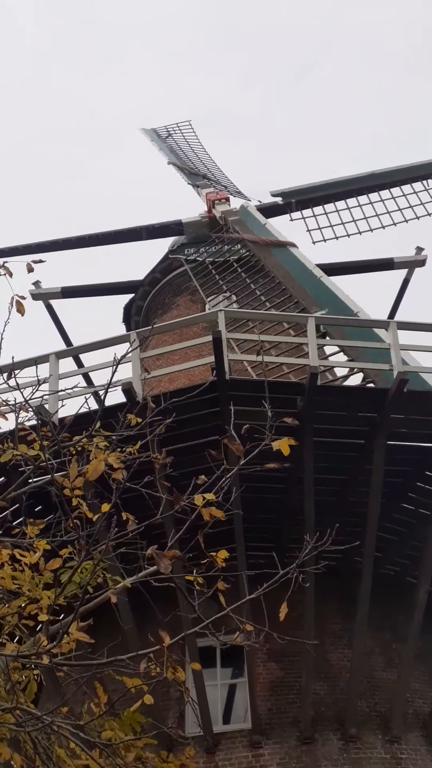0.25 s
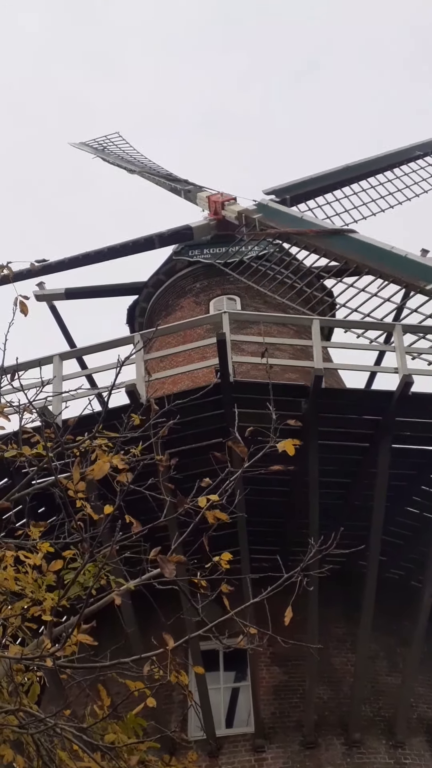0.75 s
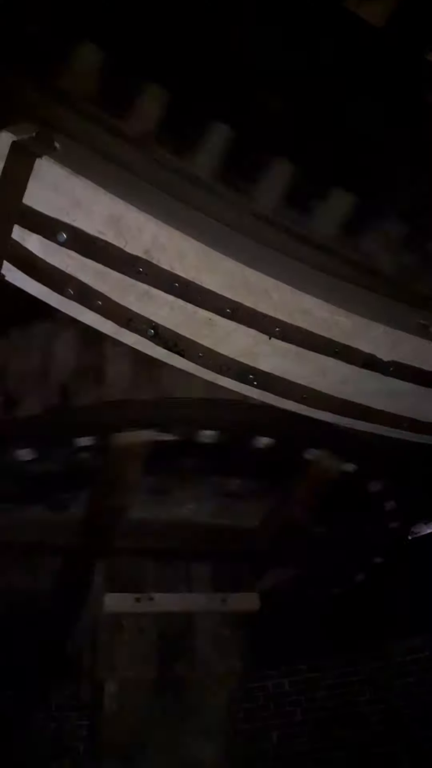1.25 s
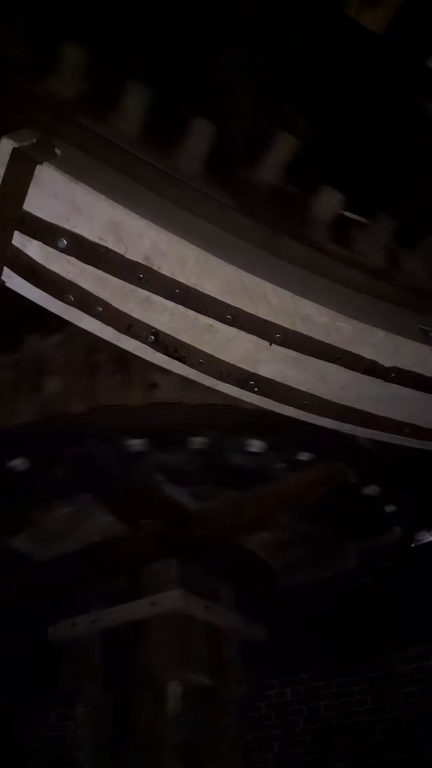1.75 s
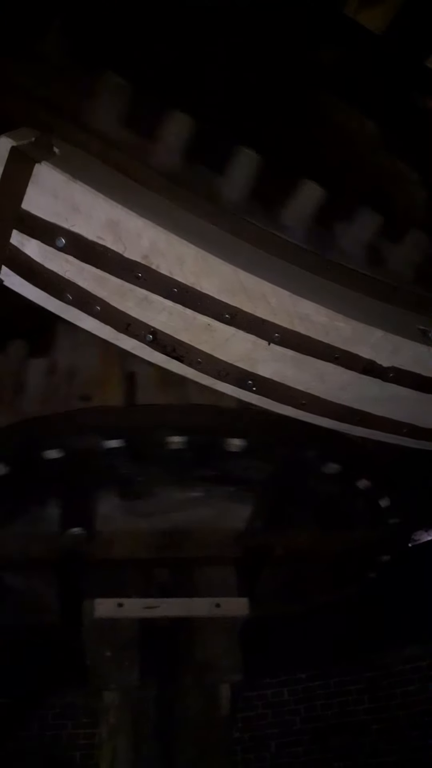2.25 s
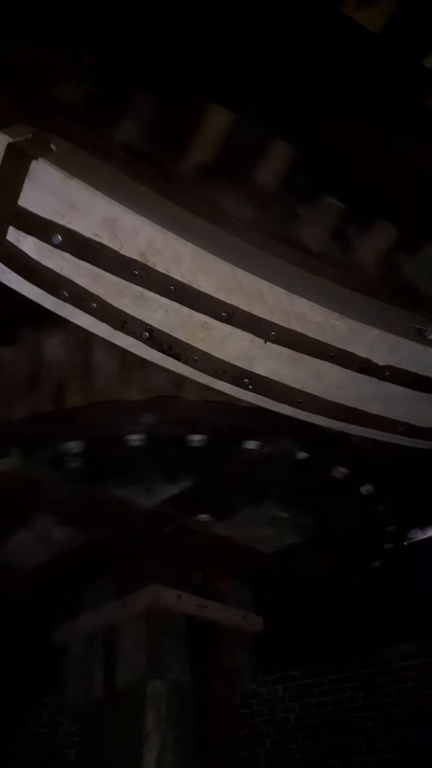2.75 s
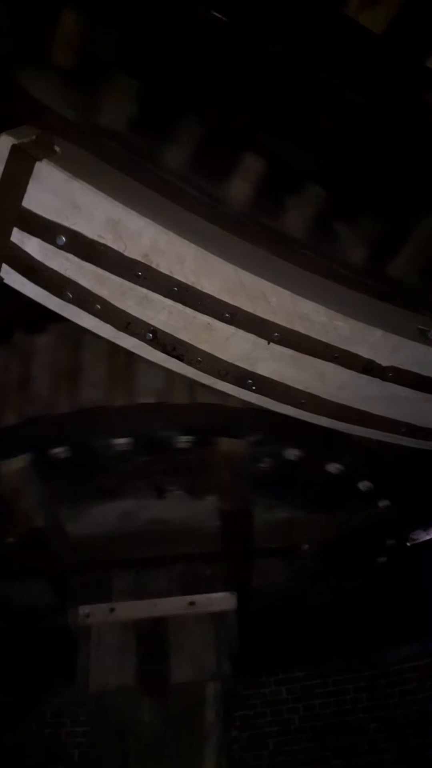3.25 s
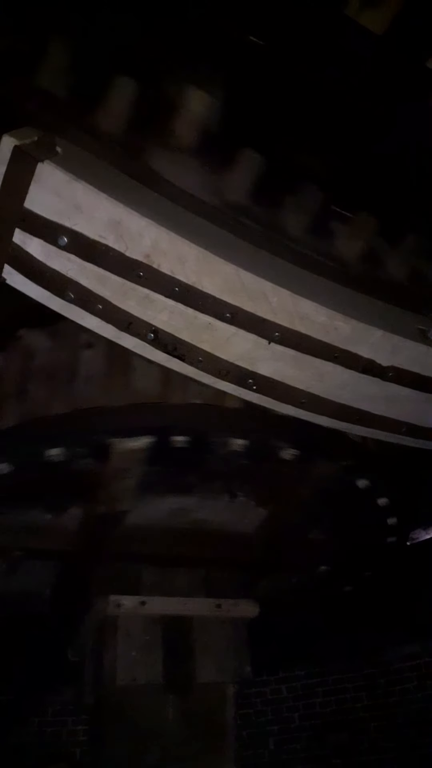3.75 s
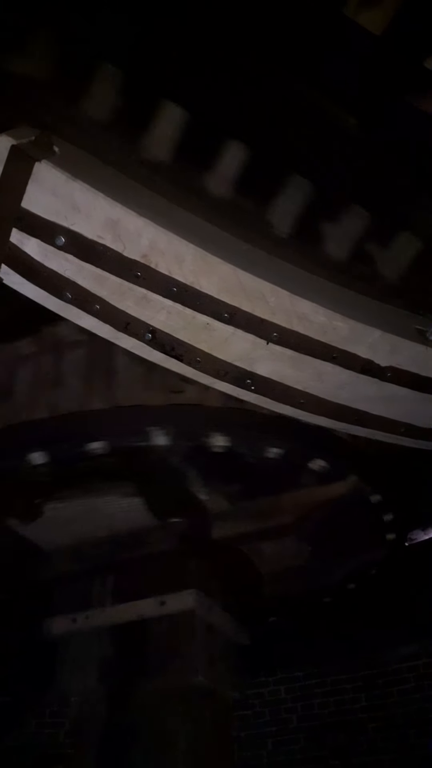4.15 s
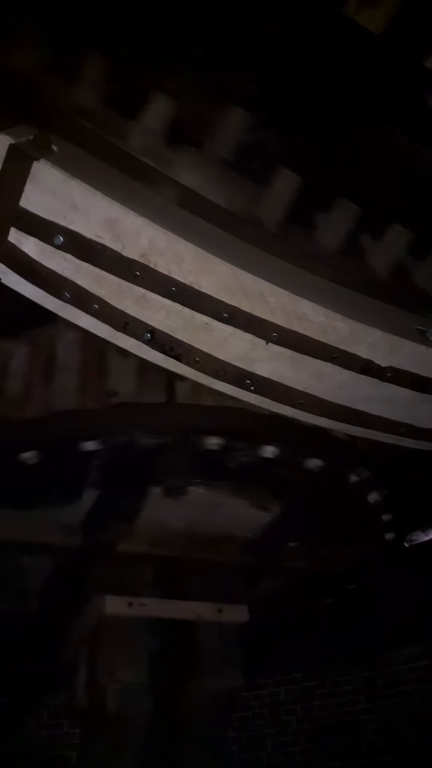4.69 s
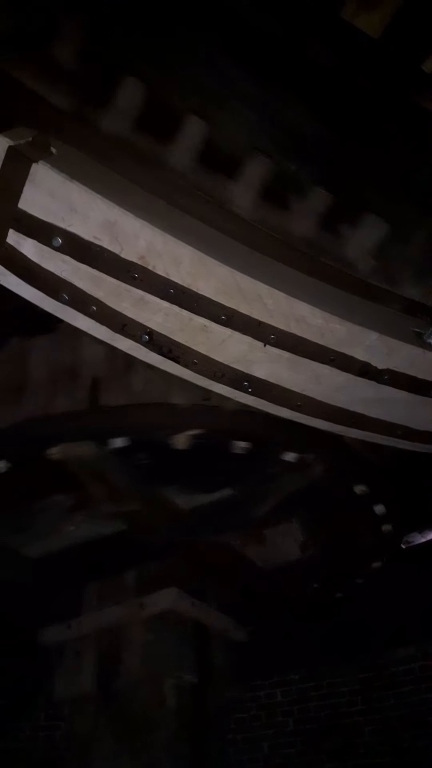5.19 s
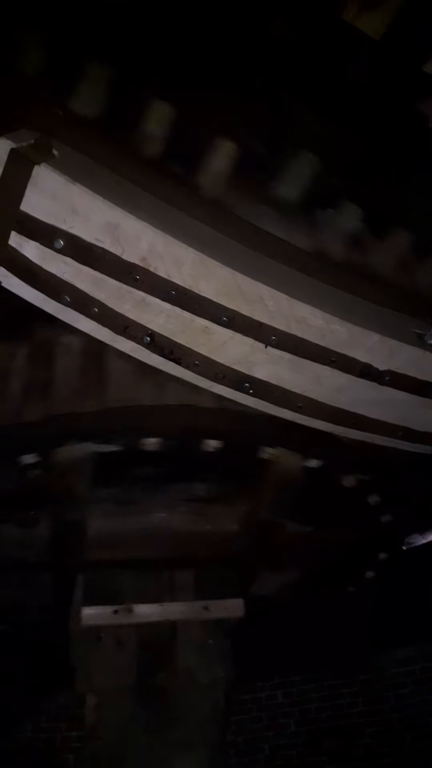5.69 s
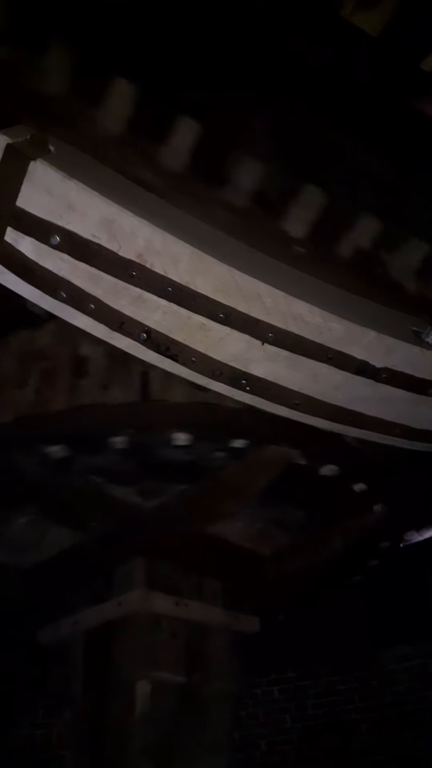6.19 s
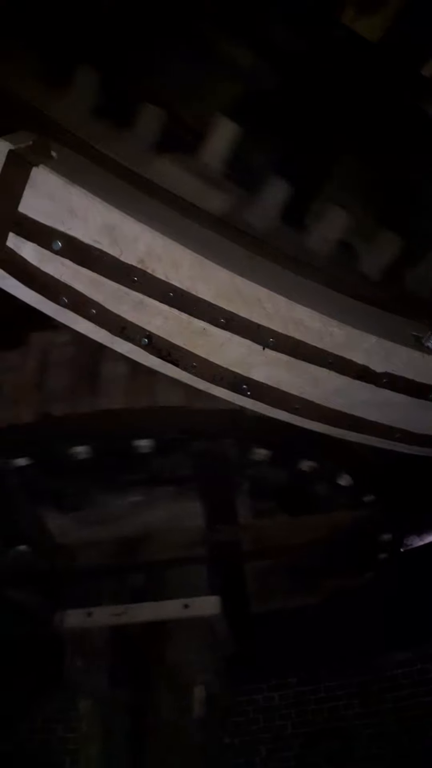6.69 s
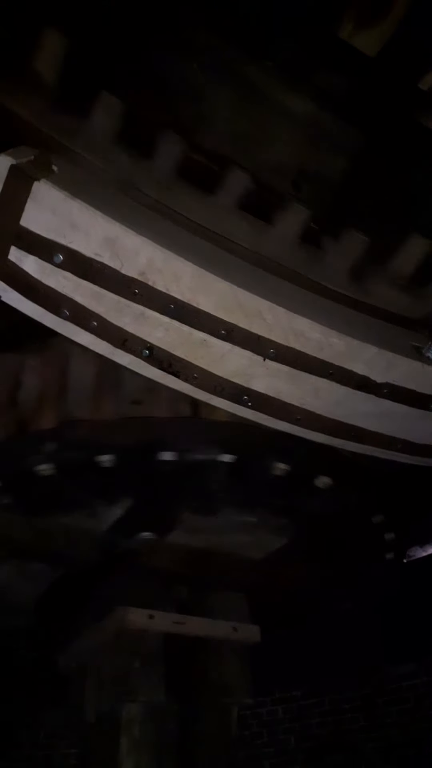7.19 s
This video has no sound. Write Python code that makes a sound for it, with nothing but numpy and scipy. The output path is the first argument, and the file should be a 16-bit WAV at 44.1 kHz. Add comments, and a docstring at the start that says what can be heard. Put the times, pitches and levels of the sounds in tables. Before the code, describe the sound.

From 0 to about 1.2 s, outdoor wind buffets in low uneven gusts over a steady rush, with extremely faint leaf rustle. It stops abruptly, leaving near-silence for about a tenth of a second. From 1.3 s we are inside the mill: a low continuous gear rumble, grainy wooden creaking and faint hiss. Softer clacks and thuds come around 1.8-2.05 and 2.5-2.7 s, with dull shaft bumps between. A firm double knock lands at 3.3 s, a small dry close tick at 3.8, and weaker clacks at 4.1-4.2. A cluster from 4.6 peaks in the sharpest clack near 4.8; a short scrape follows at 5.0 and another strong knock at 5.3. Soft bumps at 5.7, moderate clustered knocks at 6.2-6.6 and 6.9, then a heavy booming double clack at 7.4 before the end. Creaks swell towards the blows, brief squeals rub alongside, and wooden ringing decays quickly in the loft.

```python
"""Wooden cogs clack irregularly inside a windmill's cap, shaking the wheel and floor beams while the loft rings on.
Each clack is filtered noise shaped by timber resonances and reflections, with decaying sines for spokes and rim.
Before this, wind rushes round the mill outside as coloured noise, then stops in a short near-silence.
Inside, the gears rumble and creak harder as the load builds towards each clack, and some cogs squeal as they slide.
Between clacks the shaft bumps dully as short damped oscillations, and one small dry tick sounds close by."""
import sys
import numpy as np
from scipy import signal
from scipy.fft import rfft, irfft, next_fast_len
from scipy.io import wavfile
from scipy.ndimage import uniform_filter1d

SR = 44100
rng = np.random.default_rng(int(sys.argv[2]) if len(sys.argv) > 2 else 0)


def wav_out(sig):
    """Save sig, one row per channel (or a flat mono array), as 16-bit PCM at SR to the path in sys.argv[1]."""
    wavfile.write(sys.argv[1], SR, np.round(np.clip(np.atleast_2d(sig).T, -1, 1) * 32767).astype(np.int16))


N = 328015
TIME = np.arange(N) / SR  # s

# Blows of the cogs. Each row: start in seconds, then levels before trim in dB of clack, floor boom,
# wheel thud and crack, and the frequency in Hz near which the struck part of the wheel rings.
COG_BLOWS = [(1.77, -44.5, -46, -44, -68, 654), (1.911, -33.5, -55, -37, -41.5, 1120),
             (2.011, -30.5, -57, -38, -42, 1550), (2.02, -30.5, -35, -25.5, -40.5, 755),
             (2.531, -48, -42.5, -36, -72, 545), (2.698, -26.5, -29.5, -36.5, -44, 1110),
             (3.321, -17.5, -36.5, -34, -30, 780), (3.334, -19.5, -34, -39, -39, 614),
             (4.068, -31, -61, -31.5, -46.5, 1400), (4.118, -31.5, -63, -32.5, -53, 1400),
             (4.216, -27.5, -47, -45, -51.5, 1115), (4.611, -23, -42.5, -25.5, -42, 390),
             (4.702, -30, -42, -36, -42.5, 390), (4.762, -19, -65, -28, -33, 1550),
             (4.772, -9.5, -35, -24.5, -34, 1380), (4.8, -17, -38.5, -33.5, -51, 1190),
             (5.295, -14.5, -33.5, -24, -34.5, 1220), (5.318, -21, -31.5, -24.5, -39, 457),
             (6.213, -42, -57, -42, -66, 755), (6.281, -26, -33, -25.5, -40, 755),
             (6.317, -53, -36, -26.5, -42, 390), (6.419, -32, -32.5, -28, -41, 1550),
             (6.459, -32, -39.5, -38, -42, 545), (6.564, -46, -60, -46, -50.5, 1550),
             (6.855, -52, -57, -61, -73, 760), (6.95, -31, -30.5, -31.5, -43, 745),
             (7.375, -17, -22.5, -23.5, -38, 870), (7.406, -22, -22.5, -23.5, -57, 1180)]
# Likeness of left and right inside the mill. Each row: frequency in Hz, correlation from 0 to 1.
INSIDE_LIKENESS = [(50, 0.93), (150, 1), (350, 0.69), (700, 0.3), (1400, 0.0056), (3000, 0), (14000, 0.017)]
# Left-right balance inside the mill. Each row: frequency in Hz, left over right in dB.
INSIDE_BALANCE = [(50, 1), (170, 2.5), (350, -2.5), (700, 2.5), (1400, -10), (3000, -7), (6000, 3),
                  (14000, 6.5)]


def gain_of(db):
    """Logarithmic level: 20 dB is a factor of ten in amplitude."""
    return 10 ** (np.asarray(db) / 20)


def evened(x):
    """Normalization of signal power: scales to rms 1."""
    return x / np.sqrt(np.mean(x ** 2) + 1e-20)


def read(points, hz):
    """Interpolation of a spectrum along a logarithmic frequency axis."""
    f, value = np.transpose(points)
    return np.interp(np.log(hz + 1), np.log(f + 1), value)


def add(mix, s, sound):
    """Linear superposition: adds a stereo sound to the mix at time s."""
    start = max(round(s * SR), 0)
    part = mix[:, start:][:, :sound.shape[1]]
    part += sound[:, :part.shape[1]]


def band(x, hz, kind, order=3):
    """Causal Butterworth filtering: low-, high- or band-pass with a maximally flat passband."""
    return signal.sosfilt(signal.butter(order, hz, kind, fs=SR, output="sos"), x)


def panned(db):
    """Interaural level difference: splits db into left and right gains."""
    db = np.atleast_1d(db)
    return gain_of(np.array([db, -db]) / 2)


def paired(x, likeness, balance):
    """Coherence between two ports: mid and side shares of unrelated signals set their correlation."""
    hz = np.fft.rfftfreq(x.shape[1], 1 / SR)
    a, b = rfft(x)
    correlation = np.clip(read(likeness, hz), -1, 1)
    mid = np.sqrt(1 + correlation) * a
    side = np.sqrt(1 - correlation) * b
    return irfft(np.array([mid + side, mid - side]) * panned(read(balance, hz)), x.shape[1])


def noise(spectrum, likeness, balance, patchy_db):
    """Stationary random noise, coloured by a spectral density and modulated in time-frequency patches."""
    white = rng.standard_normal((2, next_fast_len(N)))
    hz, _, z = signal.stft(paired(white, likeness, balance), SR, nperseg=1024)
    patches = uniform_filter1d(rng.standard_normal(z.shape[1:]), size=6, axis=0)
    patches = evened(uniform_filter1d(patches, size=5, axis=1))
    z = z * gain_of(read(spectrum, hz)[:, None] + patchy_db * patches)
    return evened(signal.istft(z, SR, nperseg=1024)[1][:, :N])


def wind():
    """Turbulent pressure fluctuation: lumpy low buffeting, a steady rush through the sails, faint leaves."""
    # Spectrum of the air. Each row: frequency in Hz, relative density in dB per Hz.
    air_colour = [(15, -37), (25, -47), (90, 0.5), (110, -3), (158, -30), (181, -9.5), (256, -12),
                  (318, -6), (378, -6.5), (412, -18.5), (512, -17), (1360, -17), (1850, -25.5), (2100, -26),
                  (4500, -54.5), (5850, -62), (9900, -120)]
    # Gusts. Each row: time in seconds, buffeting level before trim in dB.
    gust_levels = [(0.0, -36.5), (0.27, -37.5), (0.37, -32.5), (0.538, -44.5), (0.674, -36.5), (0.706, -46),
                   (0.914, -35), (0.94, -39.5), (1.16, -41)]
    # Spectrum of the leaves. Each row: frequency in Hz, relative density in dB per Hz.
    leaf_colour = [(20, -55), (2000, -28), (3400, -10), (4600, -11), (6500, -19.5), (10000, -19.5),
                   (16000, -39)]
    # Stirring of the leaves. Each row: time in seconds, level in dB.
    leaf_levels = [(0, -75), (.4, -72.5), (.55, -79), (.76, -73.5), (.92, -79.5), (1.16, -74)]
    # Likeness of left and right outside. Each row: frequency in Hz, correlation.
    outside_likeness = [(60, 0), (130, 0.55), (290, 0.97), (640, 0.63), (1410, 0.35), (3100, 0.13),
                        (6820, -0.0), (15000, 0.026)]
    # Balance outside. Each row: frequency in Hz, left over right in dB.
    outside_balance = [(60, 0), (110, 1), (200, 3), (380, -0.5), (700, 0), (1290, -7.5), (2380, -6.5),
                       (4400, 3), (8120, 1.0), (15000, -6)]
    buffet_trim_db, rush_db = 1, -39

    air = noise(air_colour, outside_likeness, outside_balance, patchy_db=1.5)
    buffet_gain = gain_of(np.interp(TIME, *np.transpose(gust_levels)) + buffet_trim_db)
    buffet = buffet_gain * evened(band(air, 235, "lowpass"))
    leaf_gain = gain_of(np.interp(TIME, *np.transpose(leaf_levels)))
    leaves = leaf_gain * noise(leaf_colour, outside_likeness, outside_balance, patchy_db=1)
    rush = gain_of(rush_db) * evened(band(air, 222, "highpass"))
    return buffet + leaves + rush


def microphone_hiss():
    """Self-noise of a microphone: steady random noise of fixed colour."""
    # Spectrum of the hiss. Each row: frequency in Hz, relative density in dB per Hz.
    hiss_colour = [(2350, -42.5), (4000, -14.5), (4340, -14.5), (4570, -14), (5240, -12.5), (6670, -12.5),
                   (8640, -25), (13300, 3), (15800, 2.5)]
    return gain_of(-67.5) * noise(hiss_colour, INSIDE_LIKENESS, INSIDE_BALANCE, patchy_db=1.0)


def wood(size=4096):
    """Minimum-phase response of the timber: resonances on a broad colour, made causal by a Hilbert transform."""
    # Colour of struck wood. Each row: frequency in Hz, relative level in dB per Hz.
    wood_colour = [(24, -45.5), (40, -17.5), (139, -10.5), (174, -10), (197, 1), (325, 3.5), (377, -2.5),
                   (562, -5.5), (926, -9.5), (1160, -9.5), (1380, -15.5), (1520, -17.5), (3930, -34.5),
                   (8730, -62), (15500, -55.5)]
    # Its resonances. Each row: frequency in Hz, width in Hz, height in dB.
    wood_resonances = [(327, 30, 2.7), (526, 48, 2.5), (680, 85, 2.5), (775, 73, 3.2), (1150, 450, 2.1),
                       (1527, 75, 1.1), (1670, 140, 1.1), (2550, 150, 3), (2980, 97, 3.5), (4170, 83, 1.6)]
    hz = np.fft.rfftfreq(size, 1 / SR)
    db = read(wood_colour, hz)
    for f, width, height in wood_resonances:
        db = db + height / (1 + (2 * (hz - f) / width) ** 2)
    both_halves = np.r_[db, db[-2:0:-1]]
    log_gain = np.log(gain_of(np.maximum(both_halves, -100)))
    spectrum = np.exp(np.conj(signal.hilbert(log_gain)))
    return np.fft.ifft(spectrum).real[None, :size // 2]


def loft(direct, spiky=0.65, clump_db=1.0, early=0.55, early_s=0.0026, size=32768):
    """Reverberation: a direct sound, then clumped beam reflections decaying exponentially in each band."""
    # Decay of the loft. Each row: frequency in Hz, time to fall 60 dB in seconds.
    loft_decay = [(60, 1), (260, 0.63), (700, 0.37), (1840, 0.35), (4850, 0.36), (14000, 0.13)]
    taps = rng.standard_normal((2, size)) * np.exp(spiky * rng.standard_normal(size))
    clumps = evened(band(rng.standard_normal(size), 140, "lowpass", order=2))
    # the nearest beams throw the sound back most strongly
    nearest = 1 + early * np.exp(-np.arange(size) / SR / early_s)
    taps *= gain_of(clump_db * np.clip(clumps, -2, 2)) * nearest
    hz, t, z = signal.stft(paired(taps, INSIDE_LIKENESS, INSIDE_BALANCE), SR, nperseg=256)
    decay = gain_of(-60 * t / read(loft_decay, hz)[:, None])
    tail = signal.istft(z * decay, SR, nperseg=256)[1][:, :size]
    tail /= np.sqrt(np.sum(tail ** 2) / 2)
    tail[:, 0] += direct
    return tail


def load():
    """Loading and relaxation: strain from 0 to 1 builds before each blow, peaks at it and eases after it."""
    build_s, ease_s = 0.043, 0.14
    coarse_time = TIME[::64]
    since = coarse_time[:, None] - np.transpose(COG_BLOWS)[0]
    strain = np.exp(-np.maximum(since / ease_s, -since / build_s)).max(axis=1)
    return np.interp(TIME, coarse_time, strain)


def sliding(timber, slips_per_s=90, rub_db=0, slip_db=-8):
    """Stick-slip friction: turning gears rumble and rub, and dull random slips creak, more so under load."""
    # Spectrum of the rumble. Each row: frequency in Hz, relative density in dB per Hz.
    drone_colour = [(25, -14.5), (53, -8), (81, -3.5), (135, 3), (177, -12), (225, -3.5), (325, -5.5),
                    (420, -18.5), (560, -19.5), (950, -25), (1550, -28), (2500, -38.5), (3300, -50.5),
                    (7000, -60.5)]
    idle_rumble_db, idle_creak_db = -44.5, -54.5
    load_rumble_db, load_creak_db = 3.5, 7.5  # added at full load

    strain = load()
    rumble_gain = gain_of(idle_rumble_db + load_rumble_db * strain)
    creak_gain = gain_of(idle_creak_db + load_creak_db * strain)
    drone = noise(drone_colour, INSIDE_LIKENESS, INSIDE_BALANCE, patchy_db=1.5)
    slip_happens = rng.random(N) < slips_per_s / SR
    slips = slip_happens * gain_of(1.3 * np.minimum(rng.exponential(1, N), 3))
    timber_in_loft = signal.fftconvolve(loft(direct=0.91), timber, axes=1)
    creaks = signal.fftconvolve(slips[None], timber_in_loft, axes=1)[:, :N]
    grain = gain_of(slip_db) * evened(band(creaks, [450, 2000], "bandpass", order=5))
    rub = gain_of(rub_db) * evened(band(drone, 464, "highpass"))
    rumble = evened(band(drone, 470, "lowpass"))
    return rumble_gain * rumble + creak_gain * (rub + grain)


def swell(x, rise, size=1800):
    """Build-up of a vibration with time constant rise in seconds; its first size samples get rms 1."""
    x = x * (1 - np.exp(-np.arange(1, x.shape[1] + 1) / SR / rise))
    return x / np.sqrt(np.mean(x[:, :size] ** 2))


def bumps(timber, level_db=-1, wet=1.0, scuff_db=-23):
    """Damped oscillation: the shaft shifts in its bearing, giving soft cycles of the beam and a faint scuff."""
    # Bumps of the shaft. Each row: start in seconds, level before trim in dB, ring frequency in Hz.
    shaft_bumps = [(1.762, -26.5, 135), (2.045, -22.5, 134), (2.097, -24, 243), (2.718, -22, 79),
                   (2.775, -23.5, 280), (2.823, -25, 70), (2.874, -27, 216), (3.05, -25, 256),
                   (3.287, -14.5, 242), (3.416, -27.5, 123), (3.83, -25, 311), (3.881, -25, 230),
                   (4.444, -25.5, 210), (4.502, -22.5, 262), (4.55, -27, 247), (5.655, -26.5, 260),
                   (5.698, -27, 253), (6.293, -18, 318), (6.379, -28.5, 318), (6.984, -21, 84)]
    rise_s = 0.0037
    out, t = np.zeros((2, N)), np.arange(SR // 10) / SR
    for s, db, hz in shaft_bumps:
        push = t / rise_s * np.exp(-t / rise_s) * np.sin(2 * np.pi * hz * t)
        path = loft(direct=0)
        beam = wet * signal.fftconvolve(path, push[None], axes=1)
        add(beam, 0, np.array([push, push]))
        scuff = band(signal.fftconvolve(path, timber, axes=1), [400, 800], "bandpass")
        add(out, s, gain_of(db + level_db) * beam / abs(beam).max())
        add(out, s, gain_of(db + scuff_db) * swell(scuff, rise=0.006))
    return out


def knocks(timber, boom_db=-3, thud_db=-4, clack_db=-11, crack_db=-2):
    """Impact and inertia: the cog face cracks first; the heavier wheel and floor take longer to get moving."""
    # a harder clack starts faster and comes from further right; rise and pan hold at medium_db
    medium_db, medium_rise_s, medium_pan_db = -23, 0.00061, 3
    quicken_db_per_db, pan_db_per_db = 0.27, 0.08
    out = np.zeros((2, N))
    for s, clack, boom, thud, crack, _ in COG_BLOWS:
        blow = signal.fftconvolve(loft(direct=0.31), timber, axes=1)
        harder = clack - medium_db
        rise = medium_rise_s * gain_of(-quicken_db_per_db * harder)
        cog = gain_of(clack + clack_db) * swell(band(blow, [450, 1500], "bandpass"), rise)
        cog += gain_of(crack + crack_db) * swell(band(blow, 1593, "highpass", order=4), rise)
        frame = gain_of(thud + thud_db) * swell(band(blow, [150, 450], "bandpass"), rise=0.013)
        frame += gain_of(boom + boom_db) * swell(band(blow, 177, "lowpass"), rise=0.028)
        add(out, s, cog * panned(medium_pan_db - pan_db_per_db * harder) + frame)
    return out


def staves(wet=0.92, rise=0.002, level_db=-2):
    """Modal vibration: each blow leaves spokes and rim ringing, and the loft's reflections make the ring waver."""
    # Modes of spokes and rim. Each row: frequency in Hz, level against the clack before
    # weighting and trim in dB, time to fall 60 dB in seconds.
    wheel_modes = [(393.6, -2.5, 0.39), (454.4, 0.5, .18), (569, -11, .2), (604, -3, 0.39),
                   (684, -10.5, 0.49), (756, -8.5, 0.11), (808, -7, .22), (1137, -22.5, 0.074),
                   (1163, -10.5, .1), (1190, -14, 0.11), (1505, -5, 0.049)]
    fall_db_per_octave = 31  # modes far from the struck part ring less
    out, t = np.zeros((2, N)), np.arange(SR // 2) / SR
    hz, db, t60 = np.transpose(wheel_modes)
    decay = np.exp(-np.log(1000) * t / t60[:, None])
    modes = (1 - np.exp(-t / rise)) * decay * np.sin(2 * np.pi * hz[:, None] * t)
    for s, clack, *_, struck_hz in COG_BLOWS:
        shares = gain_of(db - fall_db_per_octave * abs(np.log2(hz / struck_hz)))
        short_ring = (shares @ modes)[None] * np.exp(-t / 0.017)
        echo = signal.fftconvolve(loft(direct=0, size=12288), short_ring, axes=1)
        sound = wet * np.linalg.norm(shares) * echo / abs(echo).max()
        add(sound, 0, (shares * panned(read(INSIDE_BALANCE, hz))) @ modes)
        add(out, s, gain_of(clack + level_db) * sound)
    return out


def ring(x, hz, db, width):
    """Resonance: lifts one narrow band, width in Hz, by db at its centre."""
    return x + (gain_of(db) - 1) * signal.lfilter(*signal.iirpeak(hz, hz / width, fs=SR), x)


def scrapes(timber, slips_per_s=700, sharpness=18, low_hz=1300):
    """Friction-excited resonance: a cog slides on its partner in a swelling run of tiny slips that squeals."""
    # Cogs scraping under load. Each row: start in seconds, length in seconds, level in dB,
    # squeal frequency in Hz, lift of the squeal in dB.
    cog_scrapes = [(2.008, 0.025, -51, 5300, 22), (2.684, 0.02, -46.5, 1650, 13),
                   (3.29, 0.042, -42, 6600, 17), (4.049, 0.15, -45.5, 1394, 14),
                   (4.742, 0.028, -45.5, 6460, 25), (4.98, 0.027, -39, 1530, 15),
                   (4.986, 0.032, -41, 2840, 9), (5.298, 0.046, -35.5, 3220, 7.5),
                   (6.205, 0.07, -60.5, 4500, 8), (6.311, 0.022, -50, 4170, 26),
                   (6.409, 0.03, -46.5, 1920, 16), (6.942, 0.1, -52, 2300, -7),
                   (7.36, 0.036, -46.5, 4600, 16)]
    out = np.zeros((2, N))
    for s, length, db, hz, squeal_db in cog_scrapes:
        count = int(length * SR)
        size, chance = rng.standard_normal(SR)[:count], rng.random(SR)[:count]
        # strong slips on a weak continuous rub
        slips = size * (0.16 + (chance < slips_per_s / SR)) * signal.windows.tukey(count, .5)
        in_timber = signal.fftconvolve(slips[None], timber, axes=1)
        sound = signal.fftconvolve(loft(direct=0.46, size=16384), in_timber, axes=1)
        sound = ring(band(sound, low_hz, "highpass", order=5), hz, squeal_db, hz / sharpness)
        around_end = sound[:, count // 2:3 * count // 2]
        add(out, s, gain_of(db) * sound / np.sqrt(np.mean(around_end ** 2)))
    return out


def ticks(width=0.00043, top_hz=2300):
    """Impulsive radiation heard direct: a tiny dry snap with no reflections."""
    # Small ticks close by. Each row: start in seconds, peak level in dB.
    dry_ticks = [(3.821, -24.5)]
    out, t = np.zeros((2, N)), np.arange(SR // 50) / SR
    snap = band((1 - t / width) * np.exp(-t / width), top_hz, "lowpass", order=6)
    for s, db in dry_ticks:
        add(out, s, gain_of(db) * np.array([snap, snap]) / abs(snap).max())
    return out


def scene(fade=0.0034, hiss_out_db=-2, tail_db=-26, tail_s=0.017, pause_db=-56):
    """Superposition under envelopes: wind outside dies abruptly into near-silence, then the mill is heard inside."""
    out_end, in_start = 1.170, 1.279  # s
    timber, air = wood(), wind()
    hiss = microphone_hiss()
    outside = np.clip((out_end - TIME) / fade + 1, 0, 1)
    outside = np.maximum(outside, gain_of(tail_db) * np.exp(-abs(TIME - out_end) / tail_s))
    inside = np.clip(np.minimum(TIME - in_start, TIME[-1] - TIME) / fade, 0, 1)
    mill = knocks(timber) + staves() + scrapes(timber) + bumps(timber) + ticks() + sliding(timber) + hiss
    open_air = outside * (air + gain_of(hiss_out_db) * hiss)
    faint_air = (1 - inside) * gain_of(pause_db) * air
    return open_air + faint_air + inside * mill


def record(dry):
    """Band limitation: the microphone drops the deepest bass, and a linear-phase low-pass removes the top."""
    lean = band(dry, 40, "highpass", order=4)
    low_pass = signal.firwin(511, 15850, window=("kaiser", 9), fs=SR)  # cutoff in Hz
    return signal.oaconvolve(lean, low_pass[None], "same")


dry = scene()
out = record(dry)
wav_out(out)
```